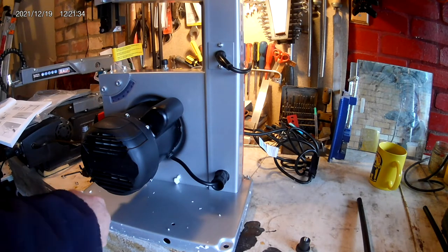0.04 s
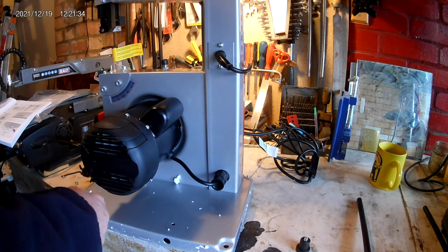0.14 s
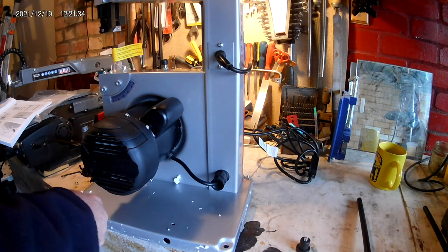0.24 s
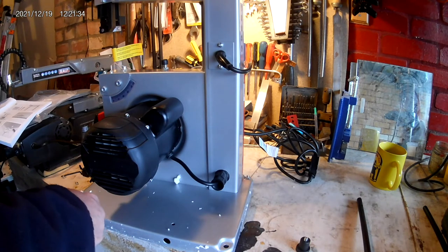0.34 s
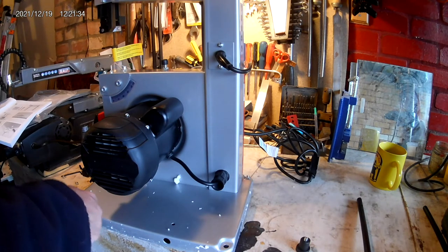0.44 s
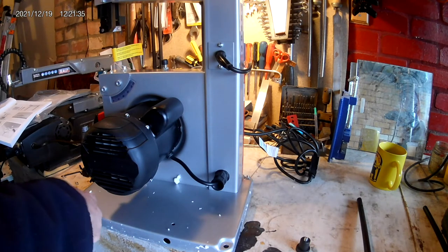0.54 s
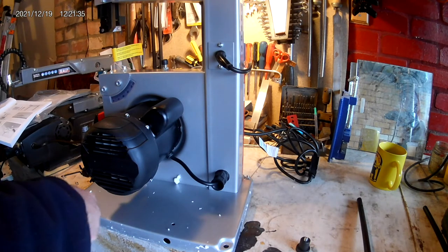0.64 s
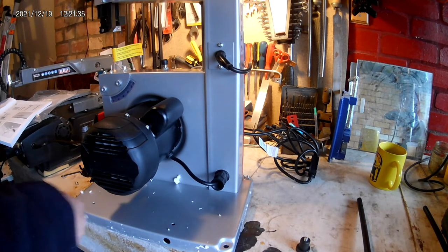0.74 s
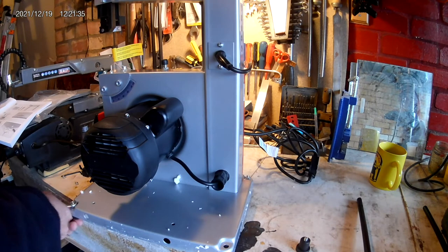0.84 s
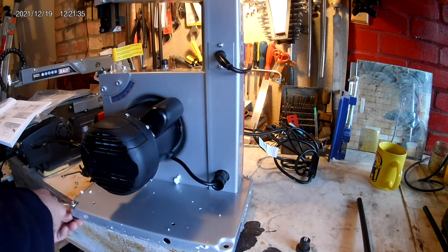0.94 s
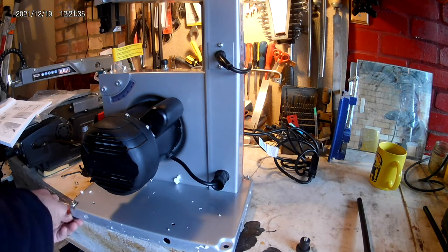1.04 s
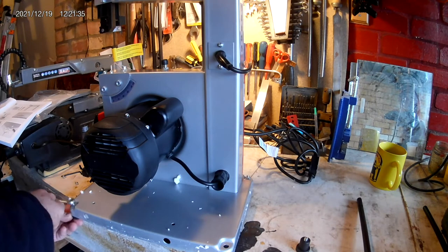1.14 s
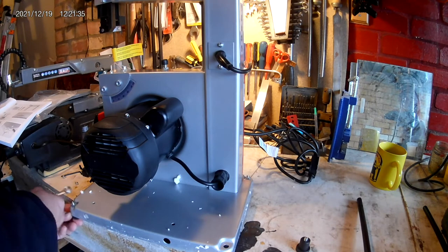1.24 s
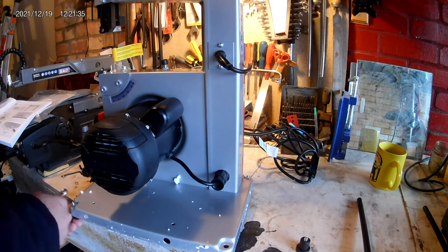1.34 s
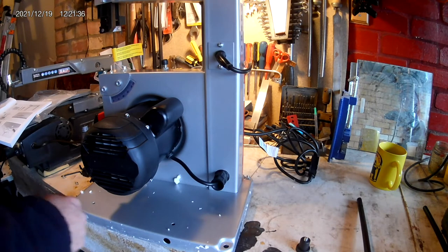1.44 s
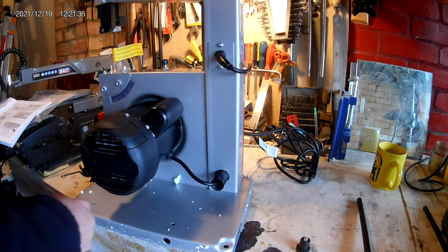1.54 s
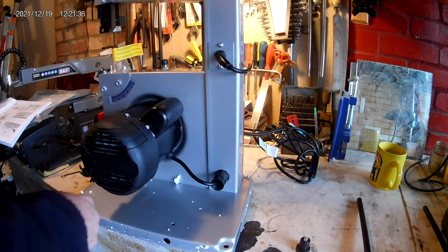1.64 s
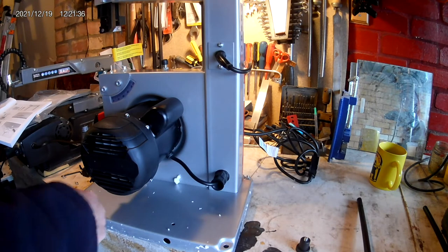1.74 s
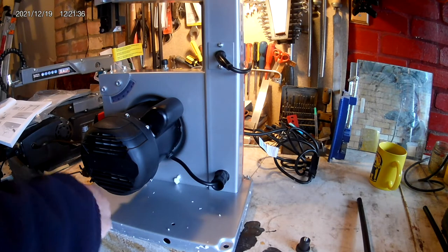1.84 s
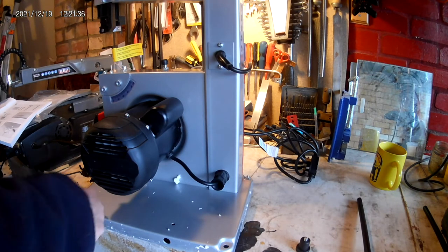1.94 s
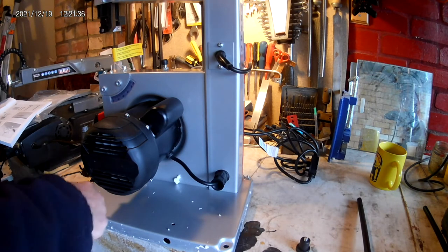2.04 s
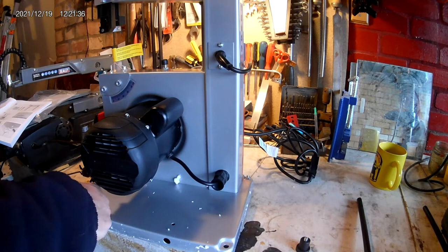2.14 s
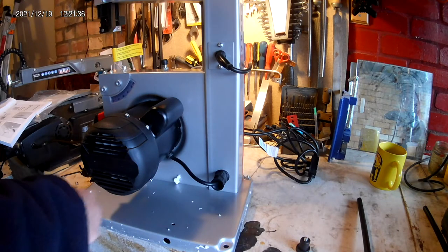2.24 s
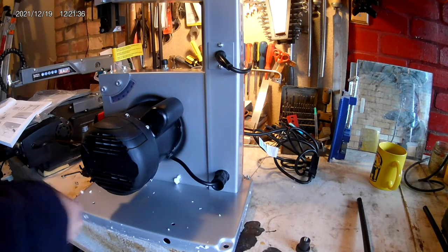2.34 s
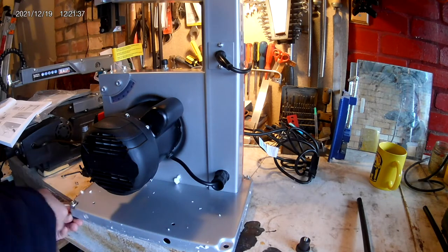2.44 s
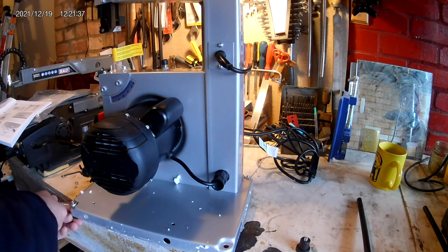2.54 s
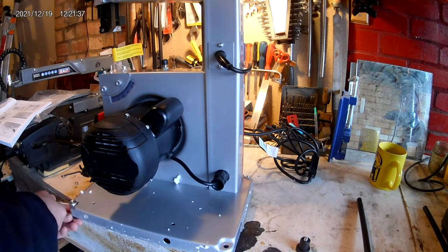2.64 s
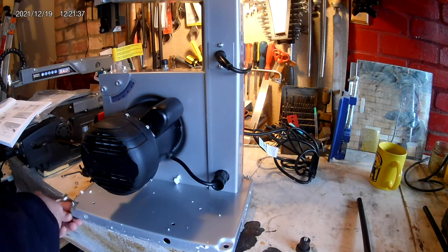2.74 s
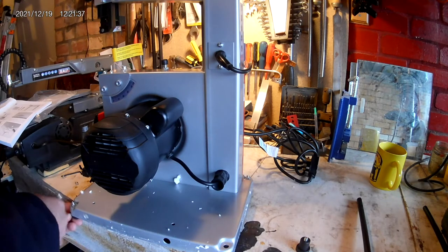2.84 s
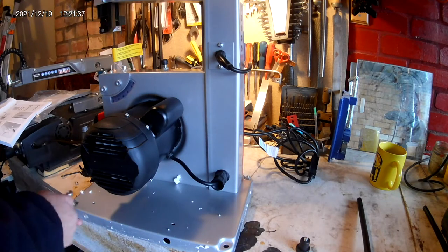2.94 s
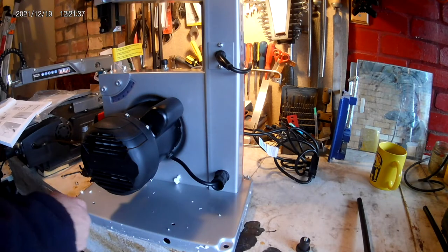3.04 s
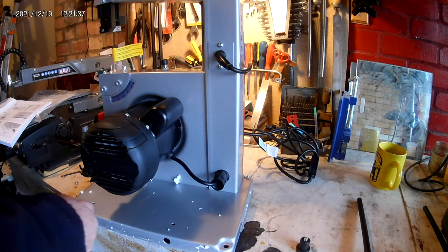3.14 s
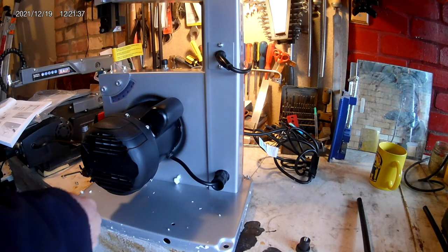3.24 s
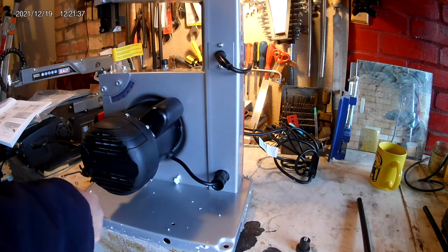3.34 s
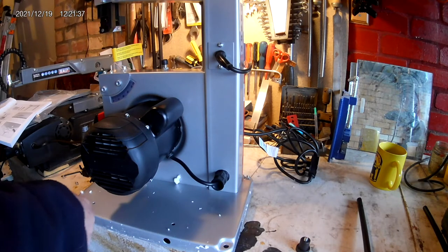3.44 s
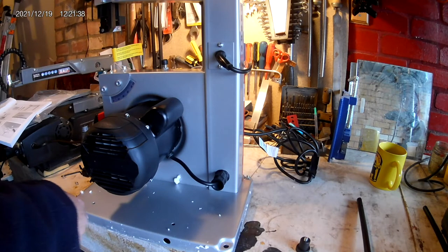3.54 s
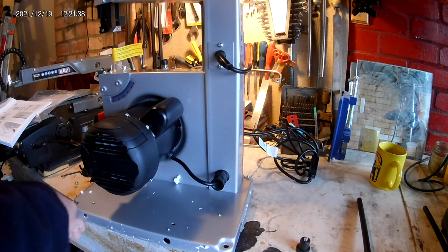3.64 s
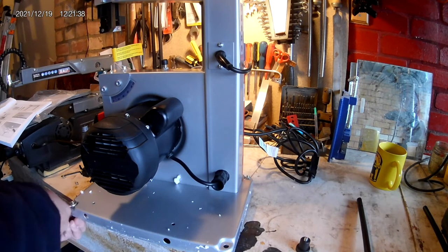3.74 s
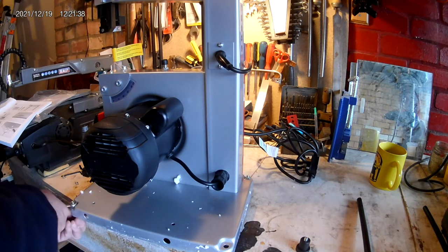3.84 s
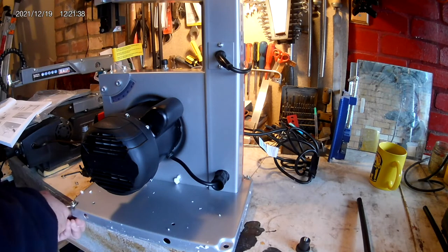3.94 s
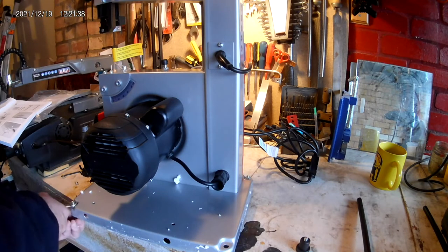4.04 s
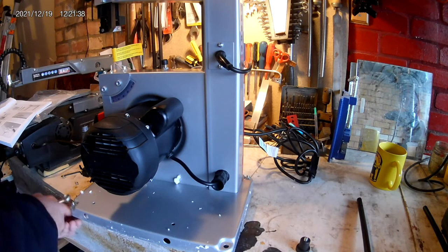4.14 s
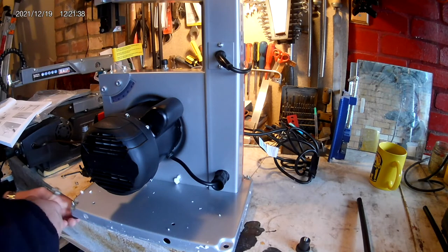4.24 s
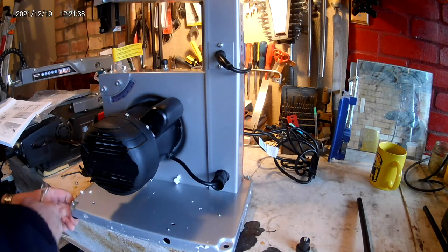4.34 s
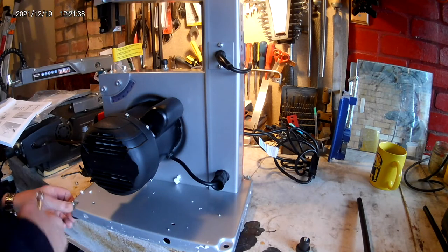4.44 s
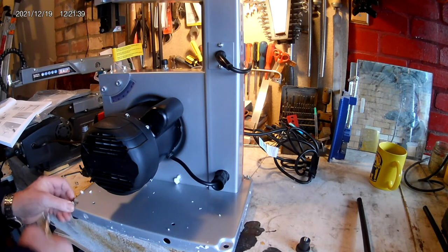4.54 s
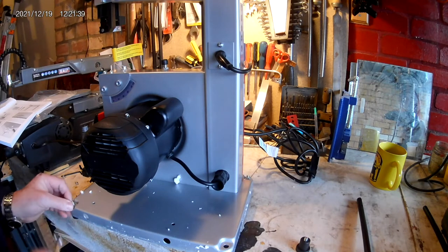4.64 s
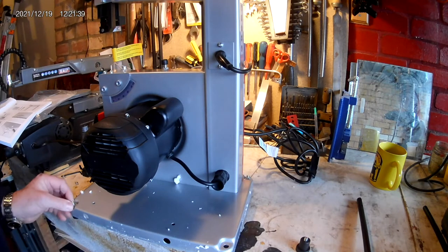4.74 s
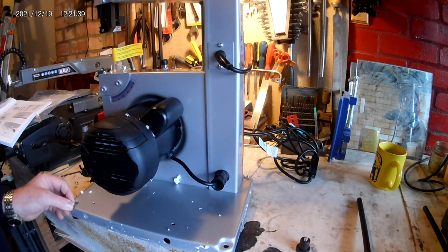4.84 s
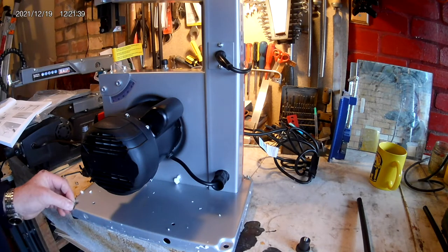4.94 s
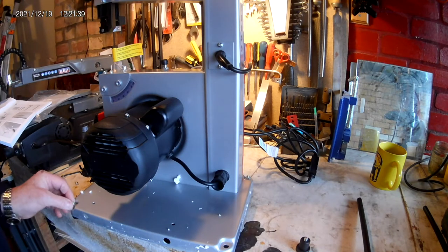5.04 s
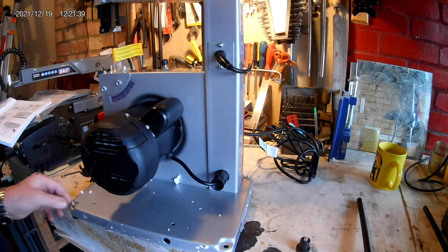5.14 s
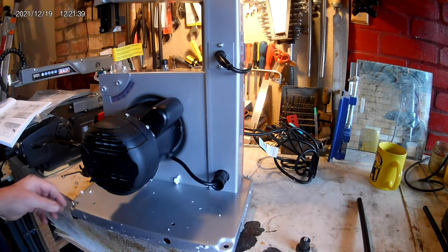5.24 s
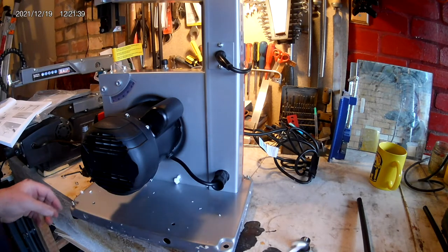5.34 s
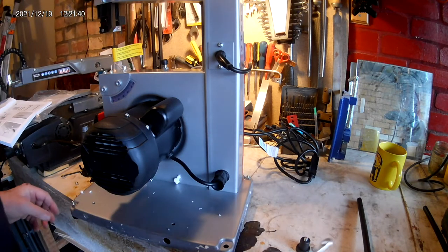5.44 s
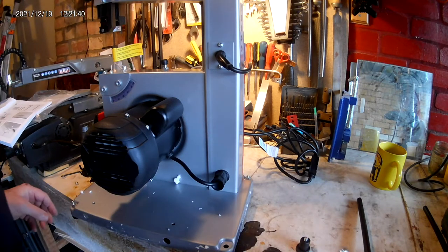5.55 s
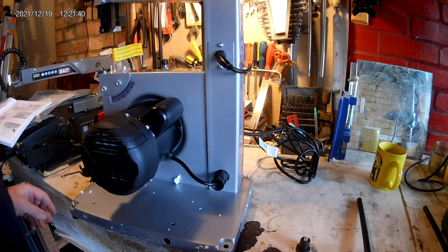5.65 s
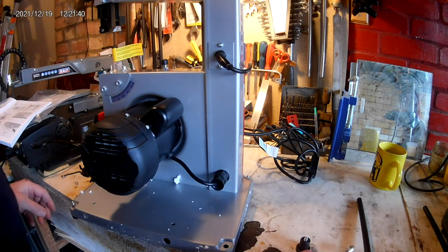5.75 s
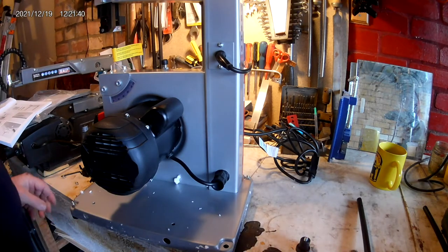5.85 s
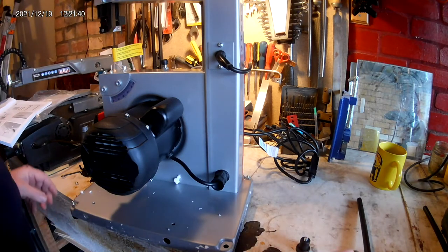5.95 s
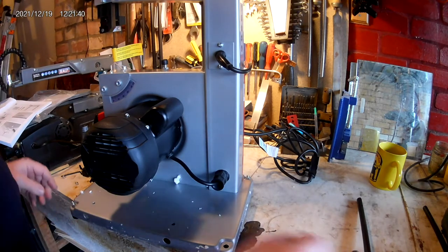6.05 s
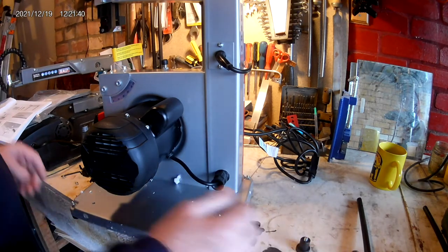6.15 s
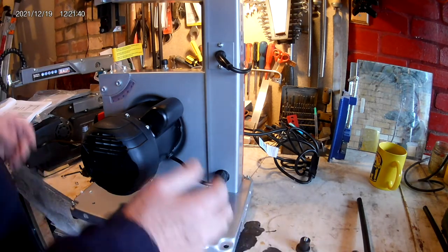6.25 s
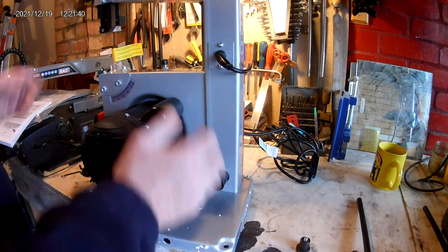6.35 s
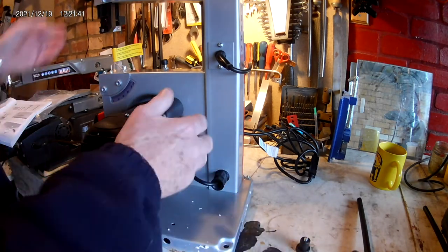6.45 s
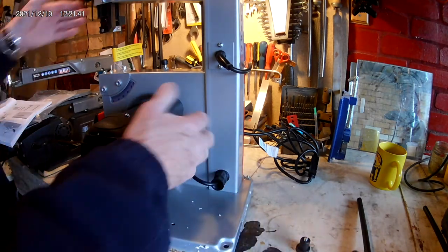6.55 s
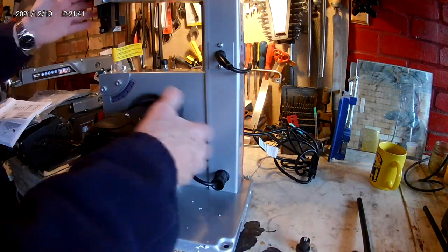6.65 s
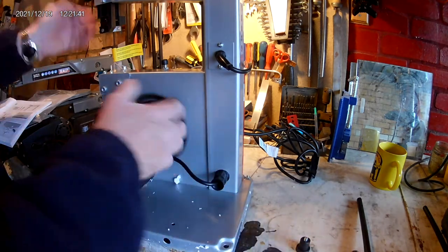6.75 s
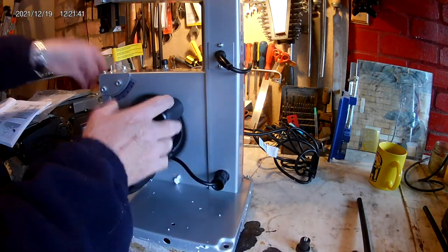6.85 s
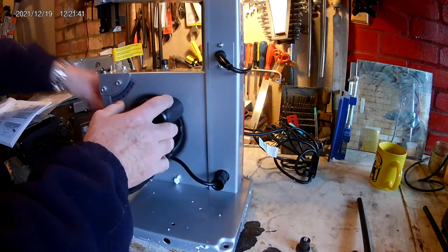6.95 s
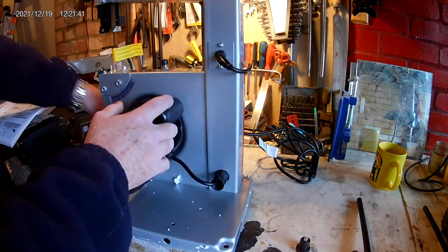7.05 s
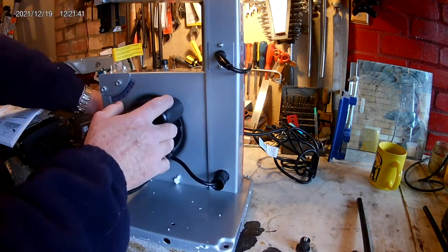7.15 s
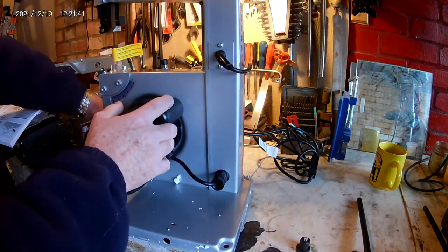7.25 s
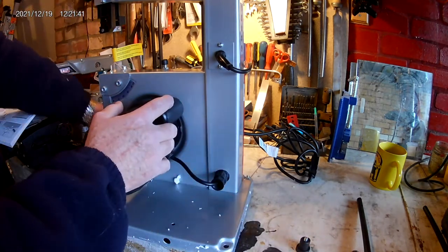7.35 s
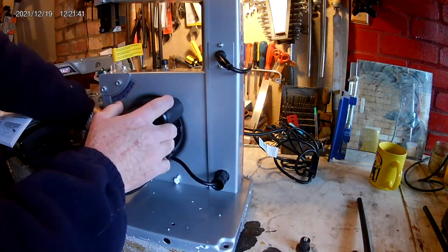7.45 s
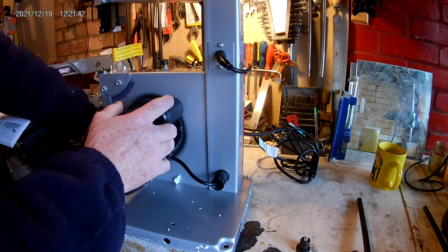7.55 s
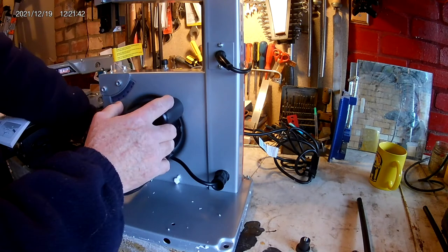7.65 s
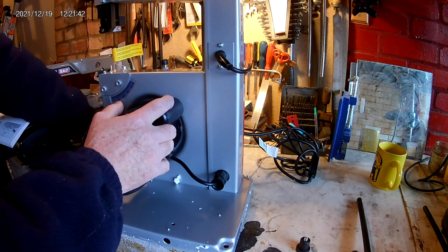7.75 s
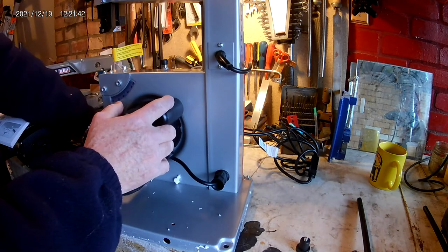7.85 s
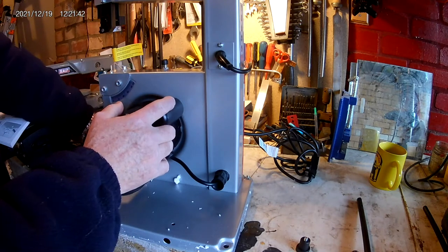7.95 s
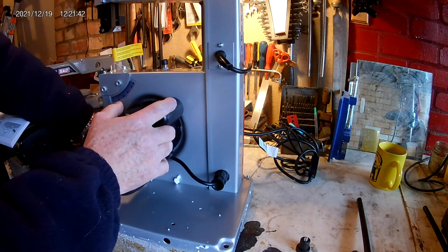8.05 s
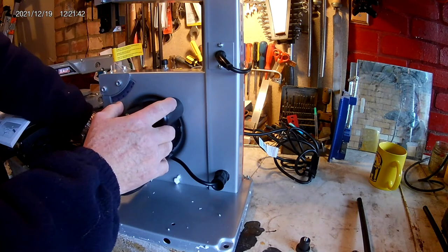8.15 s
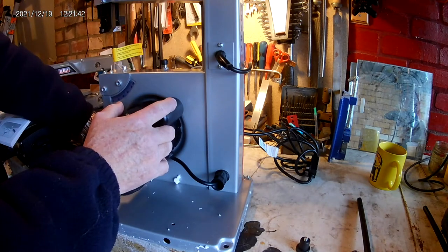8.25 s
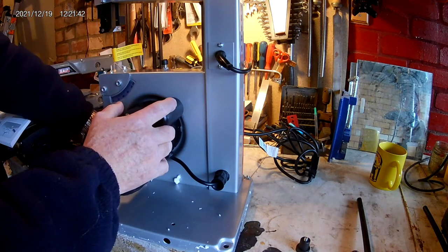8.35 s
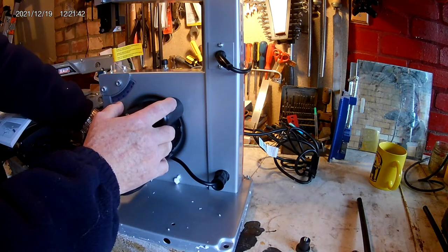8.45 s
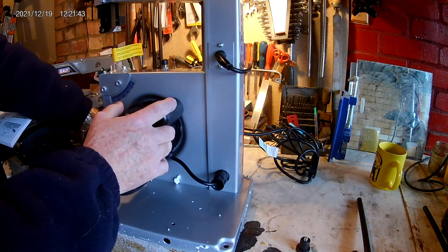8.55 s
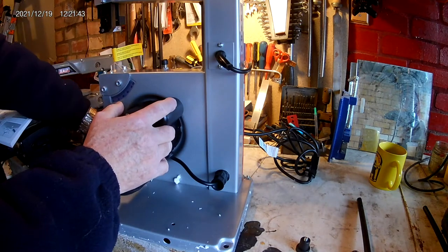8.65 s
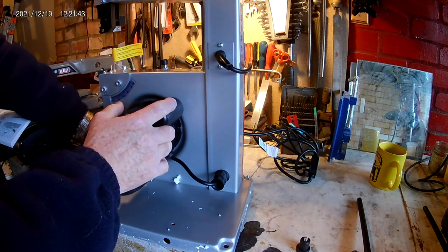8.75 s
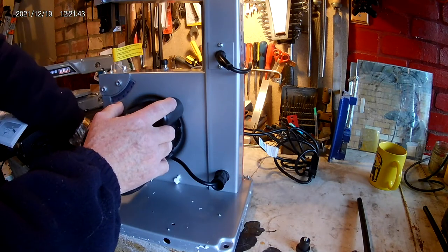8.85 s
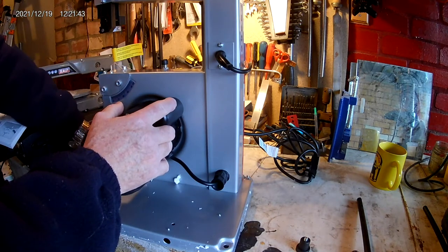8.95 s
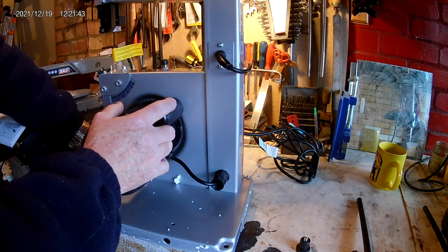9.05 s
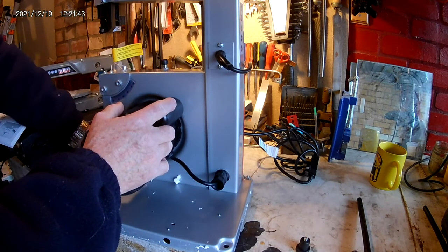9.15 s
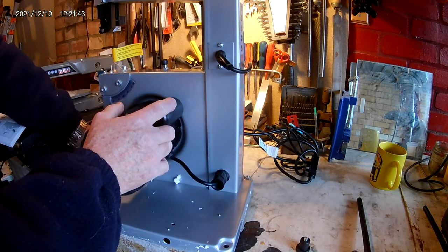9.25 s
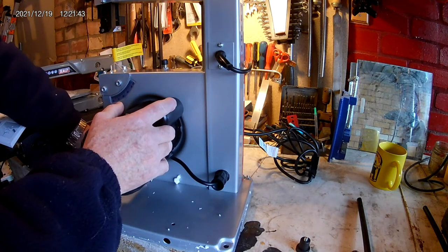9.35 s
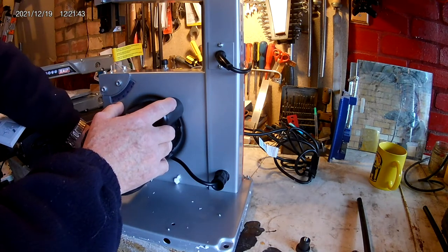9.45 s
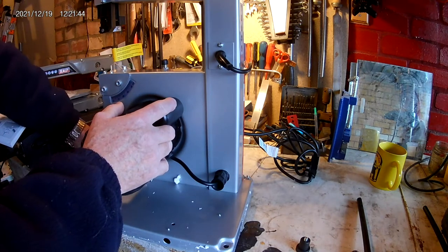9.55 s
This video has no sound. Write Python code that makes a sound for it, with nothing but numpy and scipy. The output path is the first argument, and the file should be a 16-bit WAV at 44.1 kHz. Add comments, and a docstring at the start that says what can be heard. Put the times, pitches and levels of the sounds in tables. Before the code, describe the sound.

Close up in a quiet workshop, a spanner works a bolt on a sheet-steel base, giving irregular clusters of bright clacks and rattles with faint dull knocks between. A firm thud hits the frame, then the tool clatters onto a wooden bench. After a pause a hand bumps a hollow motor housing, and small gritty thread scrapes, clicks and watch-strap ticks carry on softly.

```python
"""A spanner clacks brightly on a bolt in a sheet-steel base, among dull casing knocks, then clatters onto a bench.
A hand steadies a motor and turns a fitting: its thread scrapes, a watch strap ticks and loose metal tinkles.
Blows are filtered noise bursts plus decaying modes; the thread is a train of random slips through such bursts.
Rubs, sleeves, the low shudder after each blow and the quiet room are coloured noise.
High single notes and arm bumps are decaying sines."""
import sys
import numpy as np
from scipy import signal
from scipy.fft import rfft, irfft, next_fast_len
from scipy.io import wavfile

SR = 44100
rng = np.random.default_rng(int(sys.argv[2]) if len(sys.argv) > 2 else 0)


def log_audio(samples):
    """Write samples as a 16-bit WAV file to the path given in sys.argv[1]."""
    # one column per channel
    frames = np.atleast_2d(samples).T
    # limit to full scale, then quantise
    limited = np.clip(frames, -1, 1)
    pcm = np.round(limited * 32767).astype(np.int16)
    wavfile.write(sys.argv[1], SR, pcm)


N = 423801
RING = 12288  # samples in one ring or blow
AGE = np.arange(RING) / SR  # seconds since the blow

# Levels in the event tables are relative: each layer may add its own gain.
# Spanner meets bolt: start_s, level_db, bass_db, treble_db, rattle_db, edge_db (near 2 kHz)
CLACK_EVENTS = [(0.203, -24, -6, -12, -13, -1), (0.226, -27, -7, -13, -9, 4),
                (0.251, -21.5, -8, -18, -13, 2.5), (0.297, -33, -13, -24, -7, -0.5),
                (0.357, -44.5, 0, -78, -27, 1.5), (0.442, -42, -2, -11, -9, 4),
                (0.448, -25, -8.5, -16, -11.5, 1.5), (1.054, -38, -14, -50, 1, 4),
                (1.061, -41, 0, -12.5, -2, 4), (1.072, -48, -1, -3, -6, 6),
                (1.0833, -25, -10.5, -22, -12.5, 0.5), (1.094, -33.5, -3, -12.5, -6, -28),
                (1.113, -33, -5.5, -28, -10, -12), (1.121, -36, -10, -16, -19, -3.5),
                (1.417, -23, -4, -13.5, -19, 3.5), (1.43, -18.5, -18.5, -14.5, -9, -0.5),
                (1.441, -30, 7.5, -28, -9, 8.5), (1.591, -41.5, -12, -24.5, -25, -0.5),
                (1.735, -46, -16.5, -18, -14, -3), (1.744, -34.5, -3.5, -15.5, -9, -10),
                (1.752, -28.5, -7.5, -16.5, -24, 2.5), (1.764, -32, -5.5, -33, -14, -2),
                (2.065, -26, -8.5, -15, -34, 4.5), (2.601, -41, -10, -23.5, -14, 0),
                (3.0002, -26.5, -4.5, -11, -5.5, 1.5), (3.023, -31.5, -10, -12, -13, -2),
                (3.04, -27, -3, -9.5, -6, 0.5), (3.067, -31.5, -34, -19, -13, -6),
                (3.086, -29.5, -20, -27, -20, -10), (3.135, -32.5, 1, -14.5, -28, -2),
                (3.149, -33, 1.5, -30, -9, -4.5), (3.309, -29, -8, -31, -6, -16),
                (3.3144, -29, -11, -28.5, -22, -26), (3.319, -28.5, -11.5, -21, -12, 0),
                (3.895, -47, 7.5, -25, -21, -25), (3.909, -38, -3, -20, -8.5, -4.5),
                (4.031, -39, -5.5, -21.5, -5, 0)]
# Bolt chatters loose in its hole: start_s, level_db
BOLT_CHATTERS = [(0.251, -37), (0.447, -35), (1.43, -28), (1.754, -34.5), (2.064, -27), (2.604, -58),
                 (3.135, -48), (3.91, -43)]
# Dull knocks on the casing: start_s, level_db, bass_db, treble_db, pitch_hz, edge_db (near 2 kHz)
CASING_KNOCKS = [(0.074, -64, -11, -27, 875, 4), (0.128, -62.5, 8, -25, 870, -15),
                 (0.577, -56.5, 7, -38, 862, 0), (0.649, -58.5, 11, -37, 720, 0),
                 (0.975, -57, 2, -45, 786, -31), (1.667, -57.5, -14, -39, 813, 11),
                 (1.87, -53.5, -11, -47, 820, -13), (1.957, -58.5, -8, -35, 825, -2),
                 (3.494, -61, -4, -26, 833, -2), (3.545, -61.5, 1, -40, 862, 1),
                 (3.806, -46.5, 7.5, -53, 863, 3), (3.83, -55.5, 14.5, -48, 815, -15),
                 (4.014, -49.5, -2, -24, 1184, -4), (4.089, -60, -12, -20, 843, -14),
                 (4.107, -54.5, -14, -20, 860, 1), (4.581, -60.5, 16.5, -13, 845, 5),
                 (5.256, -61, 16, -12.5, 1006, 4.5), (7.717, -40.5, -3, -34, 808, -14),
                 (7.764, -45.5, -5.5, -37, 780, -7), (8.135, -48, -4, -39, 847, -1),
                 (8.246, -48, 6, -45, 887, -3), (8.309, -40.5, -5, -33, 827, 5)]
# Spanner's handle butts against the frame: start_s, level_db
FRAME_BUTTS = [(2.436, -13)]
# Spanner lands on the bench: start_s, level_db, bass_db, treble_db, rattle_db, edge_db (near 2 kHz)
BENCH_LANDINGS = [(5.7493, -33, -12, -20, -11, 7), (5.7517, -26.5, -17, -21, -18, 6.5),
                  (5.782, -22.5, -9, -31.5, -8, -3.5), (5.802, -23.5, -20.5, -28, -11, -5),
                  (5.822, -21, -4, -23, -1, 0), (5.8251, -20, -11, -19, -8, -6),
                  (5.832, -26.5, -9, -19, -5, -7), (5.84, -35, -2, -19, -14, 3),
                  (5.87, -19, -13, -28.5, -21, -6.5), (5.875, -22, -7, -18.5, -8, -5.5),
                  (5.889, -25, -16, -27, -5, 4), (5.902, -26.5, -9, -25, -5, -4),
                  (5.922, -32, -11, -15.5, -13, -5)]
# A hand takes hold of the motor: start_s, level_db
MOTOR_GRIPS = [(6.917, -18.5), (6.924, -14.5)]
# The fitting catches in its hole: start_s, level_db, bass_db, treble_db, rattle_db
FITTING_CATCHES = [(7.48, -54.5, 2, -13, 6), (7.517, -56.5, -1, -10, -17), (7.632, -38, -7, -11.5, -23),
                   (7.642, -30.5, -10, -22, -3), (7.833, -56, -12, -8, -8), (7.871, -54, -4, -12, -7),
                   (7.896, -53, -13, -16, -6), (7.934, -55, -10, -11.5, -8), (7.994, -51.5, -10, -19, 0),
                   (8.173, -57.5, 0, -27, -9), (8.286, -57, -7, -23, -22), (8.342, -40.5, -1.5, -12.5, -2),
                   (8.972, -50.5, -16, -32, -10), (8.991, -50, -7, -20, -2), (9.043, -43, -23, -17, -10),
                   (9.134, -48.5, -9, -19.5, -3), (9.209, -70, -1, -23, -7), (9.239, -56, -6, -30, -4),
                   (9.277, -51, -17, -19, 0)]
# Fingers push the thread round: start_s, length_s, level_db, scratch_db (relative to level_db)
THREAD_PUSHES = [(7.707, 0.13, -46.5, -25.5), (7.823, 0.16, -45, -31), (7.971, 0.23, -51.5, -30),
                 (8.098, 0.095, -45, -36), (8.251, 0.065, -45, -27), (8.327, 0.072, -43.5, -21),
                 (8.924, 0.048, -52, -30), (8.963, 0.1, -44, -22), (9.081, 0.092, -43.5, -31),
                 (9.188, 0.27, -50.5, -31), (9.381, 0.069, -45.5, -35), (9.575, 0.069, -49, -18)]
# Links of the watch strap tick as the wrist turns: start_s, level_db
STRAP_TICKS = [(5.266, -52), (6.631, -62), (6.671, -55), (6.706, -49), (6.733, -54), (6.78, -54),
               (6.802, -50), (6.845, -56), (7.834, -48), (7.9, -48), (8.005, -58), (8.064, -50),
               (8.283, -45), (9.018, -52), (9.1, -49), (9.118, -46), (9.221, -60)]
# High single notes, first the spanner's 7 kHz ring, then small loose metal tinkles: start_s, level_db, pitch_hz
HIGH_NOTES = [(0.445, -57, 6870), (7.512, -59.5, 6970), (7.6544, -66, 6870), (7.8306, -76, 6900),
              (8.0641, -74, 7000), (8.165, -72, 6990), (8.2833, -68, 6960), (9.1122, -64.5, 6260),
              (9.4114, -78, 6300)]
# A fingertip squeaks on the paint: start_s, length_s, level_db, pitch_hz
FINGER_SQUEAKS = [(4.315, 0.053, -69, 844), (4.423, 0.085, -70.5, 1250)]
# Brief rubs of hand and cuff: start_s, length_s, level_db, centre_hz
HAND_RUBS = [(3.298, 0.026, -50, 896), (4.012, 0.035, -52.5, 1210), (5.255, 0.051, -70.5, 1670),
             (8.872, 0.049, -70, 1830), (8.964, 0.03, -64, 1500), (9.576, 0.076, -60.5, 1460)]
# A sleeve brushes the bench as the arm shifts: start_s, length_s, level_db
SLEEVE_BRUSHES = [(0.0, 0.25, -68), (1.148, 0.63, -68), (1.83, 0.32, -68), (2.384, 0.27, -65),
                  (3.78, 0.14, -75), (4.033, 0.69, -72.5), (5.24, 0.063, -64), (6.777, 0.09, -72),
                  (7.465, 0.28, -66), (7.849, 0.54, -70), (8.895, 0.19, -69), (9.533, .11, -67.5)]
# Soft bumps of the arm: start_s, level_db, pitch_hz
ARM_BUMPS = [(1.301, -57, 216), (1.888, -53, 128), (2.006, -54, 145), (6.808, -53, 140), (8.16, -48.5, 124),
             (8.176, -47, 56.6)]

# Ringing modes, with levels relative within each object: pitch_hz, level_db, t60_s
# Steel base plate
PLATE_MODES = [(155.2, -21.5, 0.36), (370.7, -15.5, 0.14), (589.4, -18.5, 0.089), (635.6, -19, .14),
               (680.4, -13.5, 0.18), (738, -10, 0.13), (826, -8.5, 0.15), (869.5, -8, 0.18),
               (1058, -14.5, 0.079), (1172, -15.5, 0.16), (1291, -10.5, 0.076), (1351, -12.5, 0.091),
               (1409, -14, 0.15), (1454, -15, 0.18), (1700, -23.5, 0.17), (1863, -17, 0.15),
               (1970, -26, .15), (2192, -15.5, 0.12), (2346, -22.5, 0.078), (2428, -17.5, 0.11),
               (2483, -16.5, 0.11), (3060, -43, 0.055), (3372, -23, 0.054)]
# The spanner's own high modes
SPANNER_MODES = [(3300, 15, .12), (3540, 11.5, 0.1), (3870, 8, 0.13), (3650, 18, 0.24), (4200, -2, .09),
                 (4400, 23, .1), (4600, 11, .09), (4630, -6, .09), (4900, -1, 0.12), (5030, 26, 0.16),
                 (5430, 13.5, .11), (6380, 14.5, 0.073), (6960, 13, 0.063), (7050, 3, 0.11), (7450, 7, .09),
                 (8500, 5, .1), (9100, 5, .1), (9500, -3, .09), (9800, 3.5, 0.11), (10000, 15.5, 0.1),
                 (10560, 3, 0.063), (11500, -6, .09)]
# The bolt
BOLT_MODES = [(4960, -8, .05), (5050, 10, 0.05), (5240, 1, 0.068), (5420, 12, 0.073), (5460, -10.5, 0.06)]
# The frame
FRAME_MODES = [(216, -12, .3), (297, -7, 0.21), (392, -11, 0.087), (738, -12, 0.19), (800, -9, 0.19),
               (900, 1, 0.086), (1196, -6.5, 0.17), (1680, -29, .2)]
# Bench boards
BOARD_MODES = [(390, -11, 0.14), (738, -20, 0.13), (925, -9, 0.26), (973, -7.5, 0.091), (1200, -9.5, 0.22),
               (1330, -16, 0.14), (1430, -11, 0.097), (2050, -17.5, 0.055)]
# What still rings in the spanner once it lies on wood
LYING_SPANNER_MODES = [(2830, -1, .13), (3460, 0.5, 0.21), (3700, -17, 0.18), (3800, 4, 0.16),
                       (3870, -7, 0.19), (4070, -2, 0.2), (4200, -13, .15), (4670, -20, 0.19),
                       (4870, -8.5, .14), (5300, -10, 0.23)]
# Motor housing
MOTOR_MODES = [(175, -6.5, 0.32), (226, -12, 0.33), (250, -8, 0.32), (318, 2, 0.095), (453, -3.5, 0.057),
               (555, -2, 0.19), (833, -9, .1), (1250, -3.5, 0.063), (1335, 0.5, .1), (1400, -5, 0.21),
               (1660, -20, 0.11), (2390, -24, .09)]

# Spectral colours, as relative density per Hz: frequency_hz, level_db
# Struck steel plate
PLATE_COLOUR = [(40, -36), (90, -16), (140, -1), (260, -12.5), (480, -15.5), (750, -5), (1300, -3),
                (2400, -7), (2750, -17.5), (3500, -10), (4400, -17.5), (5500, -18), (5900, -35.5),
                (7200, -31.5), (8000, -52), (11500, -51), (13000, -49), (15500, -55)]
# Struck casing
CASING_COLOUR = [(50, -2), (150, -16), (300, -14.5), (520, -2), (850, 7), (1400, 3.5), (1750, -20),
                 (2450, -21.5), (2900, -34.5), (5300, -38.5), (6500, -61), (15000, -54)]
# Struck wooden bench
BENCH_COLOUR = [(30, -71), (60, -20.5), (115, -11), (220, -4.5), (400, -4), (520, -7.5), (750, -4.5),
                (1100, 1), (2100, -8.5), (3000, -22.5), (3900, -18.5), (5500, -41.5), (7400, -51),
                (15400, -58)]
# Fitting caught in its hole
FITTING_COLOUR = [(50, -29), (130, 0), (250, -10), (380, 1.5), (560, -0.5), (800, 1), (1350, 3.5),
                  (1800, -6), (2300, -10), (2800, -14), (3900, -13), (4400, -21.5), (5400, -16.5),
                  (6100, -57), (9000, -45), (15500, -64)]
# Scraped thread
THREAD_COLOUR = [(50, -53.5), (130, -1), (250, -11), (380, 6.5), (560, -0.5), (850, 3.5), (1350, -2.5),
                 (1750, -11), (2350, -13), (2800, -19), (3900, -14.5), (4400, -36), (5400, -35),
                 (6100, -54), (9000, -53), (15500, -57)]
# Small dry steel contact
TICK_COLOUR = [(300, -30), (1500, -6), (2500, 1), (3000, -8), (3700, 9), (4500, -5), (5100, -1),
               (5550, -0.5), (6000, -29.5), (7200, -13), (8500, -21), (15500, -36)]
# Soft low noise, for both the brushing cloth and the shudder of plate and bench
SOFT_COLOUR = [(40, -11.5), (90, -5.5), (140, 7.5), (230, -10.5), (450, -5.5), (850, -7), (1600, -17),
               (4000, -40), (9000, -57)]
# Air of the room
AIR_COLOUR = [(12, -36), (20, -15.5), (38, 4.5), (61, -5.5), (92, 2.5), (125, -1.5), (201, -3.5), (342, -8),
              (451, -10.5), (880, -13.5), (1010, -15), (2460, -25), (7490, -35), (8610, -40),
              (15400, -45.5)]

CLINK_DB, CLINK_GROWTH = 20.5, 1.96  # clink offset in dB; dB more clink per dB of treble
GRIP_DETUNE = 0.0047  # typical share by which the grip shifts and splits the spanner's modes
LYING_DB = -1.5
PUSH_ATTACK_S, PUSH_SAG_DB, PUSH_RELEASE_S = 0.026, 14.5, 0.023
SLIPS_PER_S = 130  # at each contact spot of the thread
SNAGS_PER_S = 55  # over all contact spots together
BRUSH_ATTACK_S, BRUSH_SAG_DB, BRUSH_RELEASE_S = 0.0046, 1, 0.06
SHUDDER_S, SHUDDER_DB = 0.088, -67  # bell-shaped fall of the shudder after each blow; its top level
AIR_DB = -68.5
ROOM_T60_S, ROOM_TREBLE_T60_S = 0.25, 0.12
TOP_HZ = 15650


def spanner(gain_db=18):
    """A clack rings the steel plate; a harder contact makes the spanner's own high modes clink louder."""
    out = np.zeros(N)
    for start, level_db, bass_db, treble_db, rattle_db, edge_db in CLACK_EVENTS:
        blow = body(PLATE_COLOUR, t60=0.18, crack_db=-7.5, slap_db=-1.5, room_db=1, ripple_db=5)
        blow = blow + undb(11) * ring(PLATE_MODES, spread_db=1.5)
        blow = rattle(blow, rattle_db, gap_s=0.003)
        add(out, start, contact(blow, level_db + gain_db, bass_db, treble_db, edge_db))
        clink_db = level_db + CLINK_GROWTH * treble_db + CLINK_DB
        add(out, start, undb(clink_db) * clink(SPANNER_MODES))
    for start, level_db in BOLT_CHATTERS:
        chatter = rattle(ring(BOLT_MODES, detune=0.0099), -8.5, gap_s=0.0046)
        add(out, start, undb(level_db) * unit(chatter))
    return out


def casing(gain_db=24):
    """Hand and tool knock the casing: a dull blow with one short ring."""
    out = np.zeros(N)
    for start, level_db, bass_db, treble_db, pitch_hz, edge_db in CASING_KNOCKS:
        blow = body(CASING_COLOUR, t60=0.24, crack_db=-14, slap_db=-6.5, room_db=-13, ripple_db=3.5)
        blow = blow + ring([(pitch_hz, 1, 0.13)], spread_db=4.5)
        add(out, start, contact(blow, level_db + gain_db, bass_db, treble_db, edge_db))
    return out


def frame(thud_db=-9):
    """A padded blow on the frame excites its decaying modes over a softer noise thud."""
    out = np.zeros(N)
    for start, level_db in FRAME_BUTTS:
        thud = unit(body(CASING_COLOUR, t60=0.17, crack_db=-16, slap_db=-6, room_db=-6, ripple_db=3))
        note = unit(ring(FRAME_MODES, spread_db=2.5))
        add(out, start, undb(level_db) * (note + undb(thud_db) * thud))
    return out


def bench(gain_db=18):
    """The spanner's two ends clatter onto wood: boards answer and the lying spanner rings on."""
    out = np.zeros(N)
    for start, level_db, bass_db, treble_db, rattle_db, edge_db in BENCH_LANDINGS:
        blow = body(BENCH_COLOUR, t60=0.19, crack_db=-2.5, slap_db=1, room_db=-8, ripple_db=1)
        blow = rattle(blow + ring(BOARD_MODES), rattle_db, gap_s=0.0015)
        add(out, start, contact(blow, level_db + gain_db, bass_db, treble_db, edge_db))
        lying_db = level_db + gain_db + treble_db + LYING_DB
        add(out, start, undb(lying_db) * clink(LYING_SPANNER_MODES))
    return out


def motor(thud_db=-9):
    """The motor housing answers the hand with a short hollow ring."""
    out = np.zeros(N)
    for start, level_db in MOTOR_GRIPS:
        thud = unit(body(CASING_COLOUR, t60=0.1, crack_db=-15, slap_db=-8, room_db=-4, ripple_db=3))
        hollow = unit(ring(MOTOR_MODES, spread_db=2))
        add(out, start, undb(level_db) * (hollow + undb(thud_db) * thud))
    return out


def fitting(gain_db=23):
    """The fitting catches on the edge of its hole with a short broad crack."""
    out = np.zeros(N)
    for start, level_db, bass_db, treble_db, rattle_db in FITTING_CATCHES:
        blow = body(FITTING_COLOUR, t60=0.23, crack_db=-13, slap_db=-0.5, room_db=-7, ripple_db=7)
        blow = rattle(blow, rattle_db, gap_s=0.004)
        add(out, start, contact(blow, level_db + gain_db, bass_db, treble_db))
    return out


def thread(scrape_db=-3, scratch_db=-1, grain_db=6.0, surge_db=2.5, spots=2):
    """Each push drives surging random slips through new contact spots, with sharper snags on burrs."""
    out = np.zeros(N)
    for start, length, level_db, dry_db in THREAD_PUSHES:
        push = undb(level_db) * stroke(length, PUSH_ATTACK_S, PUSH_SAG_DB, PUSH_RELEASE_S)[:RING]
        for _ in range(spots):
            surge = steady(colour(rng.standard_normal(RING), [(20, -3), (70, -60), (250, -140)]))
            chance, strength, side = rng.random((3, RING))
            grain = np.minimum(-np.log(strength), 3)
            slips = (chance < SLIPS_PER_S / SR) * np.sign(side - 0.5)
            slips = slips * undb(grain_db * grain + surge_db * surge)
            # the spots share the push's energy
            slips = unit(slips * push) * np.linalg.norm(push) / np.sqrt(spots)
            snags = (chance < SNAGS_PER_S / spots / SR) * 2 * strength ** 2
            snags = snags * push * np.sqrt(SR / SNAGS_PER_S)
            response = body(THREAD_COLOUR, t60=0.14, crack_db=-4, slap_db=-4, room_db=-5.5, ripple_db=5.5)
            response = unit(band(response, 2360, "low"))
            add(out, start, undb(scrape_db) * signal.fftconvolve(slips, response))
            add(out, start, undb(scratch_db + dry_db) * signal.fftconvolve(snags, tick()))
    return out


def strap():
    """The links of a metal watch strap tick as small steel contacts."""
    out = np.zeros(N)
    for start, level_db in STRAP_TICKS:
        add(out, start, undb(level_db) * tick())
    return out


def high_notes(t60=0.069):
    """The spanner's 7 kHz ring, then tinkles of tiny loose metal: each is one high decaying sine."""
    out = np.zeros(N)
    for start, level_db, pitch_hz in HIGH_NOTES:
        note = np.sin(2 * np.pi * pitch_hz * AGE) * fade(t60) * (1 - fade(0.016))
        add(out, start, undb(level_db) * note)
    return out


def squeak(half_width_hz=110):
    """A fingertip squeaks on the paint: narrow noise gives one faint, unsteady note."""
    out = np.zeros(N)
    for start, length, level_db, pitch_hz in FINGER_SQUEAKS:
        edges_hz = [pitch_hz - half_width_hz, pitch_hz + half_width_hz]
        note = steady(band(rng.standard_normal(RING), edges_hz, "band"))
        add(out, start, undb(level_db) * note * swell(length))
    return out


def rubs():
    """Skin and cloth slide over the metal in short swells of band-limited noise."""
    out = np.zeros(N)
    for start, length, level_db, centre_hz in HAND_RUBS:
        edges_hz = [centre_hz / 1.18, centre_hz * 1.24]
        hiss = steady(band(rng.standard_normal(RING), edges_hz, "band"))
        add(out, start, undb(level_db) * hiss * swell(length))
    return out


def arm_and_shudder(flutter_db=6.0):
    """Cloth flutters as the arm shifts and bumps; plate and bench shudder low and soft after each blow."""
    flutter = steady(colour(rng.standard_normal(N), [(12, -5.0), (50, -51.5), (200, -120)]))
    shudders, shifts = np.zeros((2, N))
    for start, *_ in CLACK_EVENTS + BENCH_LANDINGS:
        add(shudders, start, np.exp(-(AGE / SHUDDER_S) ** 2))
    for start, length, level_db in SLEEVE_BRUSHES:
        movement = stroke(length, BRUSH_ATTACK_S, BRUSH_SAG_DB, BRUSH_RELEASE_S)
        add(shifts, start, undb(level_db) * movement)
    # one soft noise serves both; the louder of the two sets its level
    level = np.maximum(shifts, undb(SHUDDER_DB) * np.minimum(shudders, 1))
    soft_noise = steady(colour(rng.standard_normal(N), SOFT_COLOUR))
    out = soft_noise * level * undb(flutter_db * np.minimum(flutter, 1.5))
    for start, level_db, pitch_hz in ARM_BUMPS:
        thud = np.sin(2 * np.pi * pitch_hz * AGE) * fade(0.15) * (1 - fade(0.017))
        add(out, start, undb(level_db) * thud / thud.max())
    return out


def air():
    """Steady coloured noise makes the quiet rumble and hiss of the room."""
    return undb(AIR_DB) * steady(colour(rng.standard_normal(N), AIR_COLOUR))


def body(points, t60, crack_db, slap_db, room_db, ripple_db, treble_t60=0.94):
    """A click, a fast slap, dense decaying modes and a duller room tail, with extra treble decay."""
    first, near, far = rng.standard_normal((3, RING))
    slap = undb(slap_db) * unit(first * fade(0.054))
    dense = unit(near * fade(t60))
    tail = band(far, 1800, "low") * fade(ROOM_T60_S) + band(far, 2100, "high") * fade(ROOM_TREBLE_T60_S)
    room = undb(room_db) * unit(tail * (1 - fade(0.038)))
    response = slap + dense + room
    response = band(response, 2700, "low") + band(response, 2700, "high") * fade(treble_t60)
    response[0] += undb(crack_db)
    return signal.fftconvolve(response, crack(points, ripple_db))[:RING]


def ring(modes, spread_db=3.0, detune=0.0014):
    """Modes struck at a new spot: each takes another strength, sign and slightly different pitch."""
    pitch_hz, level_db, t60s = np.transpose(modes)
    size, shift, side = rng.standard_normal((len(pitch_hz), 3)).T
    waves = np.sin(2 * np.pi * (pitch_hz * (1 + detune * shift))[:, None] * AGE)
    strengths = np.sign(side) * undb(level_db + spread_db * size)
    total = sum(g * unit(wave * fade(t60)) for g, wave, t60 in zip(strengths, waves, t60s))
    return total * (1 - fade(0.0025))  # soft onset


def clink(modes, count=2):
    """The spanner's modes sound in close pairs that beat, differently at every touch."""
    return unit(sum(ring(modes, spread_db=0.0, detune=GRIP_DETUNE) for _ in range(count)))


def rattle(x, level_db, gap_s, count=3):
    """Loose metal touches again a few times, weaker at each bounce."""
    lags = np.cumsum(rng.uniform(0.5, 1.5, count) * gap_s * SR).astype(int)
    out = x.copy()
    for bounce, lag in enumerate(lags):
        out += undb(level_db) * 0.84 ** bounce * np.pad(x, (lag, 0))[:RING]
    return out


def contact(x, level_db, bass_db, treble_db, edge_db=0):
    """Weight behind a blow sets its bass; hardness of the contact sets its edge and treble."""
    power, hz = abs(rfft(x)) ** 2, np.fft.rfftfreq(RING, 1 / SR)
    bands_hz = [(80, 500), (500, 2200), (3100, 9000)]
    bass, mid, treble = (10 * np.log10(power[(hz > lo) & (hz < hi)].sum()) for lo, hi in bands_hz)
    low_db, high_db = bass_db - bass + mid, treble_db - treble + mid
    tilt = [(30, -25), (110, low_db), (350, low_db), (650, 4.0), (950, 0.0),
            (1400, edge_db), (2350, edge_db), (3000, high_db)]
    y = signal.fftconvolve(x, crack(tilt))[:RING]
    return y * undb(level_db) / np.linalg.norm(band(y, [500, 2200], "band"))  # level set by the mids


def tick():
    """One small dry contact of steel on steel."""
    return unit(body(TICK_COLOUR, t60=0.069, crack_db=-5.5, slap_db=-3.5, room_db=-5, ripple_db=6))


def stroke(length, attack_s, sag_db, release_s):
    """One movement of the hand: it builds, eases off over its length and dies away."""
    age = np.arange(SR) / SR
    build = np.minimum(age / attack_s, 1)
    sag = undb(-sag_db * np.minimum(age / length, 1))
    return build * sag * np.exp(-np.maximum(age - length, 0) / release_s)


def swell(length):
    """Half a sine: rises and falls once over its length."""
    return np.sin(np.pi * np.minimum(AGE / length, 1))


def crack(points, ripple_db=0):
    """Minimum-phase click of a given colour; ripple makes its spectrum uneven, mostly in the treble."""
    hz = np.fft.rfftfreq(RING, 1 / SR)
    knots = np.arange(0, SR / 2, 70)
    ripple = np.interp(hz, knots, rng.standard_normal(len(knots))) * np.minimum(hz / 3000, 1)
    cepstrum = irfft(np.log(gains(points, RING) * undb(ripple_db * ripple)))
    # folding the cepstrum forward packs the energy at the start
    cepstrum[1:RING // 2] *= 2
    cepstrum[RING // 2 + 1:] = 0
    return unit(irfft(np.exp(rfft(cepstrum))))


def colour(x, points):
    """Give a sound a spectral colour."""
    size = next_fast_len(len(x), True)
    return irfft(rfft(x, size) * gains(points, size), size)[:len(x)]


def gains(points, size):
    """Gain of a colour at each frequency of a transform."""
    hz, level_db = np.transpose(points)
    return undb(np.interp(np.log(np.fft.rfftfreq(size, 1 / SR) + 1), np.log(hz), level_db))


def band(x, hz, kind):
    """Low-, high- or band-pass."""
    return signal.sosfilt(signal.butter(3, hz, kind, fs=SR, output="sos"), x)


def fade(t60):
    """Free decay of a ring: 60 dB down after t60 seconds."""
    return np.exp(-np.log(1000) * AGE / max(t60, 1e-3))


def undb(db):
    """Decibels to gain."""
    return 10 ** (np.asarray(db) / 20)


def unit(x):
    """Scale to an energy of one."""
    return x / np.sqrt(np.sum(x ** 2) + 1e-30)


def steady(x):
    """Scale to a standard deviation of one."""
    return x / np.std(x)


def add(out, start, x):
    """Mix a sound in from its start in seconds."""
    i = int(start * SR)
    out[i:i + len(x)] += x[:N - i]


def scene():
    """Blows, handling and room air mixed to one channel."""
    blows = spanner() + casing() + frame() + bench() + motor() + fitting()
    handling = thread() + strap() + high_notes() + squeak() + rubs() + arm_and_shudder()
    return (blows + handling + air())[None]


def record(dry):
    """A steep low-pass cuts the top of the treble."""
    return signal.sosfilt(signal.ellip(10, 0.2, 70, TOP_HZ, fs=SR, output="sos"), dry)


dry = scene()
out = record(dry)
log_audio(out)
```